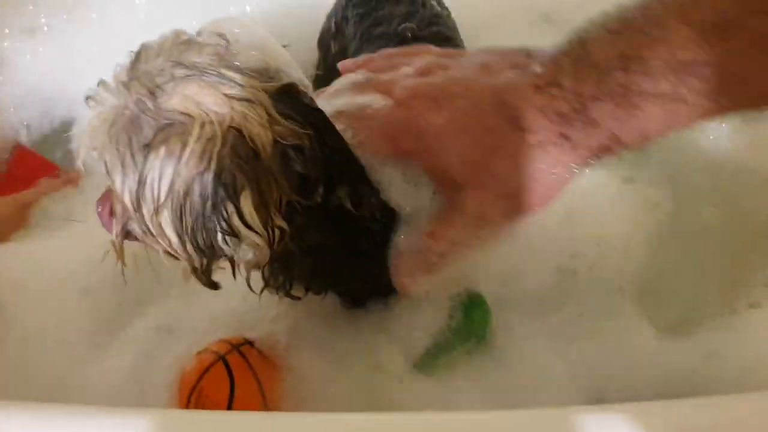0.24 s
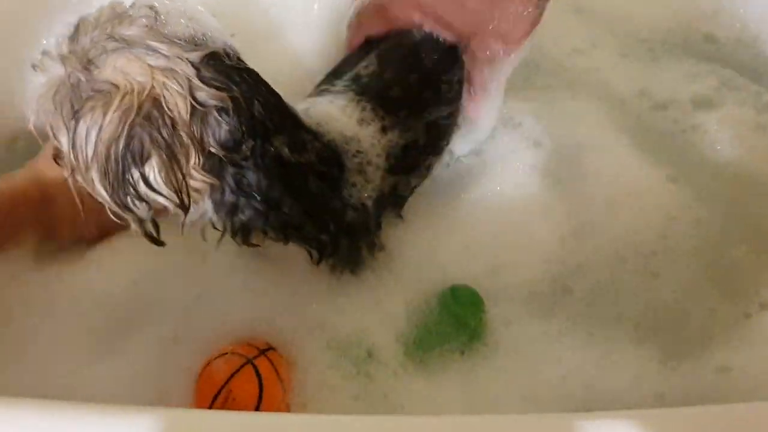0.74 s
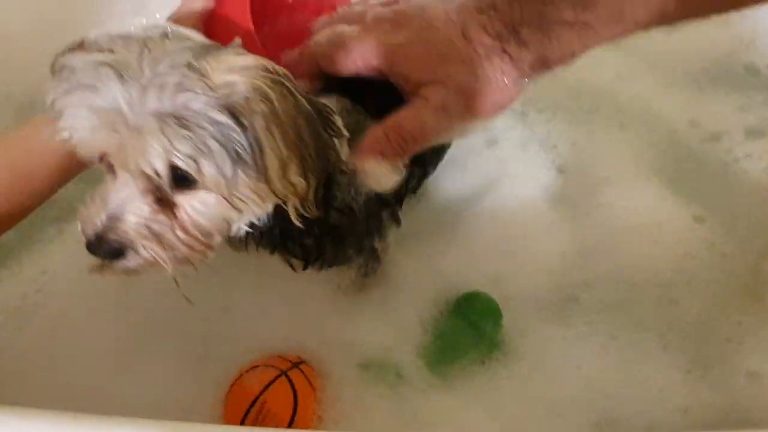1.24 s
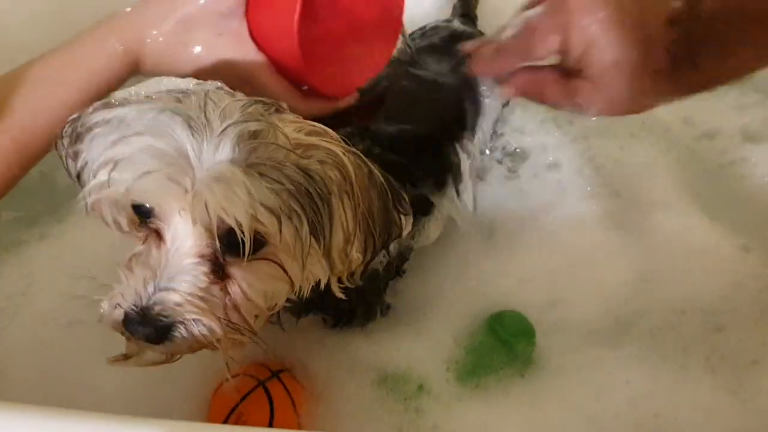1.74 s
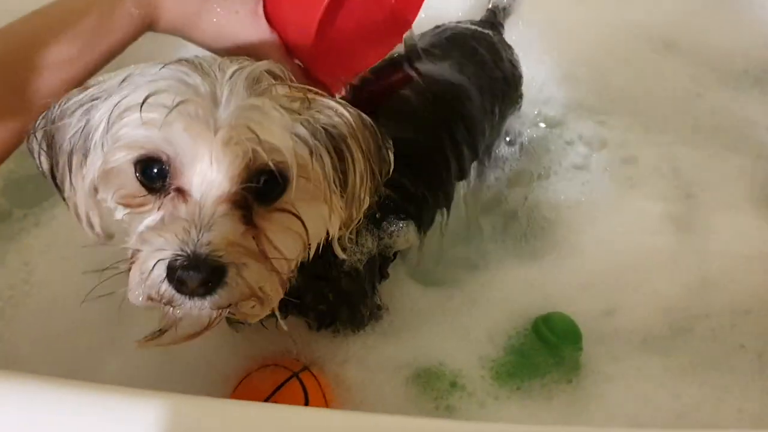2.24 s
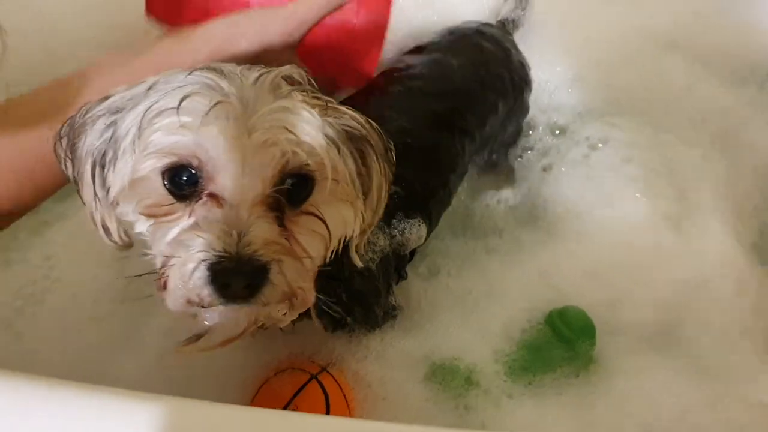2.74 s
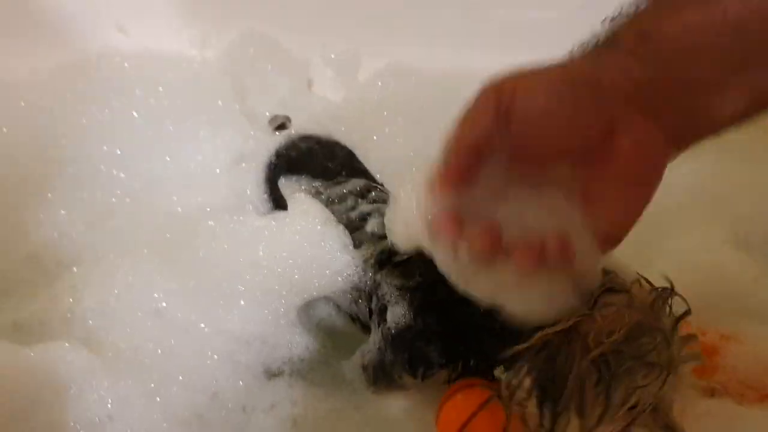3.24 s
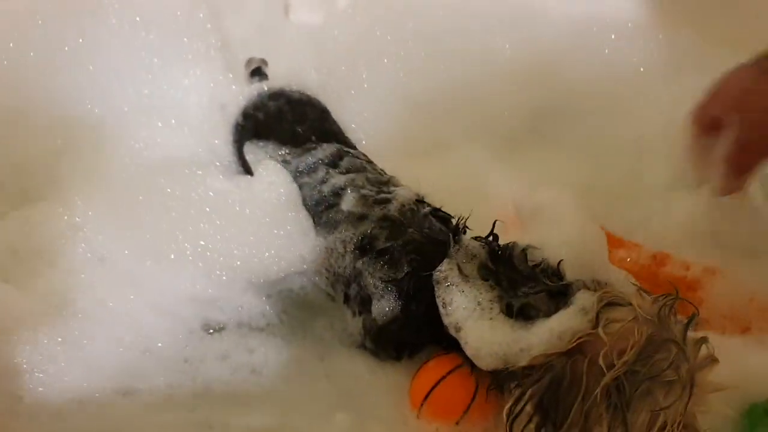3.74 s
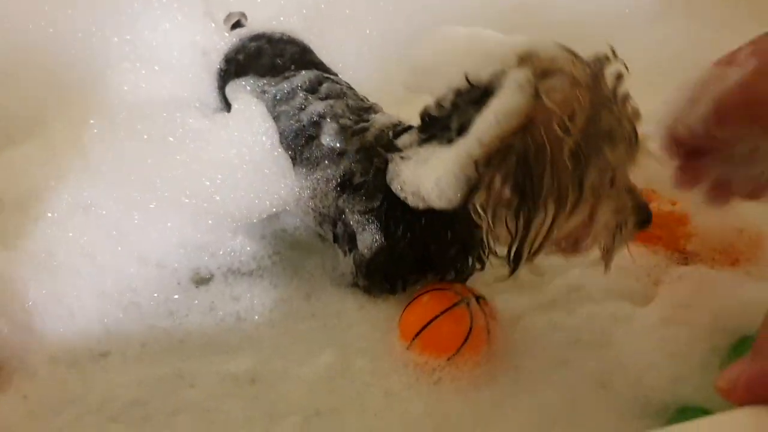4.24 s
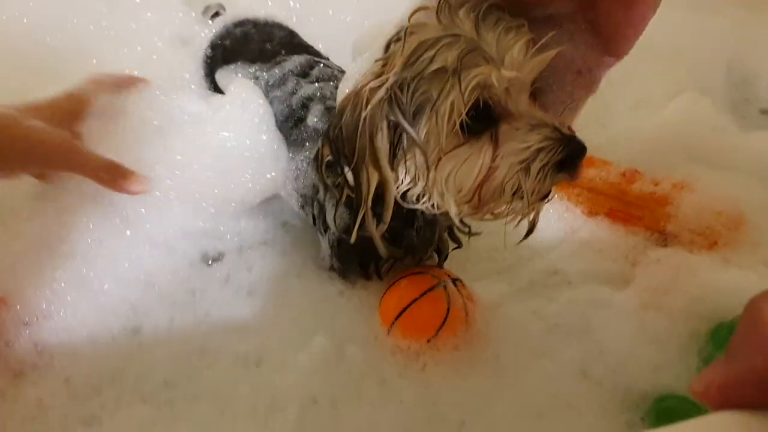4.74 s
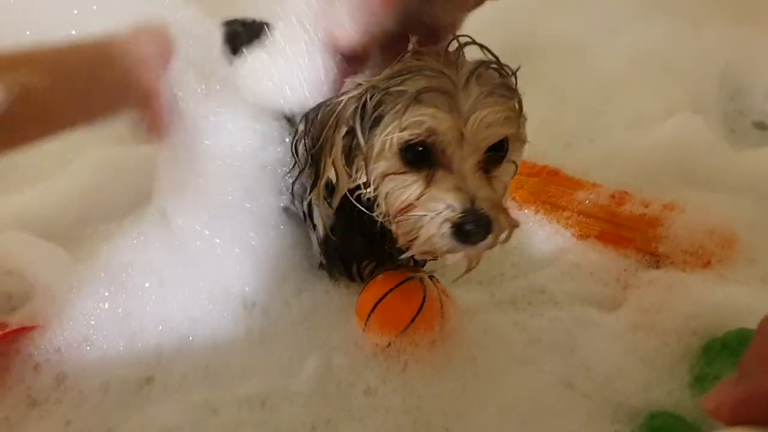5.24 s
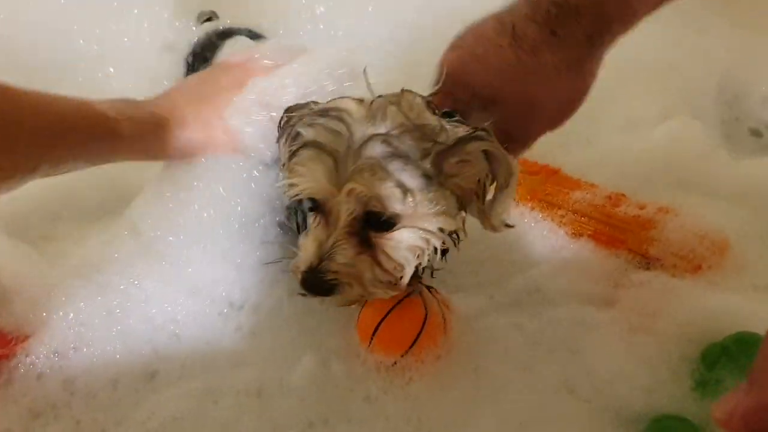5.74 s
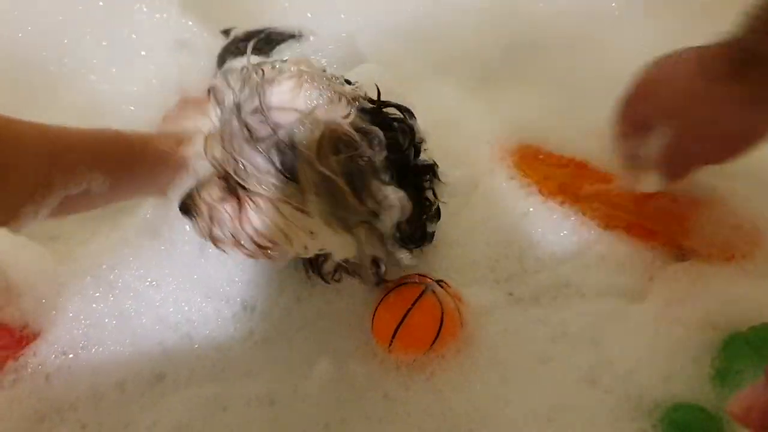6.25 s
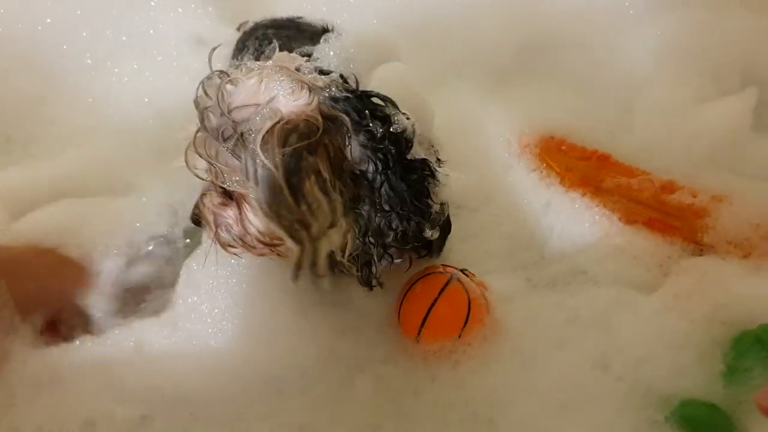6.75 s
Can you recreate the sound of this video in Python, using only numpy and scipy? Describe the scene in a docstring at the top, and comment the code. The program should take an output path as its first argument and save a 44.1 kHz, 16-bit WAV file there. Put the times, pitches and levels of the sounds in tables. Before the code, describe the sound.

Hollow thumps and bubbly plinks in a foamy bath, a brief splashing pour, then an abrupt cut to soft knocks, fizzing suds and faint humming.

```python
"""First a bubble plinks and suds swish under a hand, then slaps and booming knocks: a small dog is washed in a tub.
Hands, paws and a plastic cup strike the tub as shaped pressure pulses that ring its modes and the hard-walled room.
Poured water is a shower of tiny decaying sines; gurgles, plinks and long tub notes are sines that climb in pitch.
Near the middle it cuts to a later moment, with fizzing foam and a low hum of two wavering tones over a rumble.
Faint filtered noise is the air of the bathroom throughout."""
import sys
import numpy as np
from scipy import signal
from scipy.fft import rfft, irfft
from scipy.io import wavfile

SR = 44100
rng = np.random.default_rng(int(sys.argv[2]) if len(sys.argv) > 2 else 0)


def unload_audio(sound):
    """Save the sound as a 16-bit wav file, at the path given as the first command line argument."""
    columns = np.transpose(np.atleast_2d(sound))
    # keep every value between -1 and 1, then stretch to whole-number steps
    steps = np.round(np.clip(columns, -1, 1) * 32767)
    wavfile.write(sys.argv[1], SR, steps.astype(np.int16))


N = 307818
TIME = np.arange(N) / SR
TAIL = np.arange(SR * 3 // 5) / SR  # time axis of one event, 0.6 s
JUMP_S = 2.879  # the cut to the later moment
EDGE_HZ = 15900  # upper band limit

# paws and the cup knock the tub: [t/s, level/dB, corner f/Hz, treble fall/dB per octave, scuffing time/s,
#  tub note favoured by the spot f/Hz, floor boom level/dB, swell of the boom/s]
TUB_KNOCKS = [(0.262, -26.5, 169, 14, 0.025, 270, -40, 0.015),
              (0.338, -19, 190, 13, 0.02, 225, -15.5, 0.035),
              (0.406, -36, 620, 17.5, 0.0012, 778, -27.5, 0.042),
              (1.102, -59, 201, 14, 0.012, 225, -57.5, 0.053),
              (2.249, -25.5, 593, 21.5, 0.0012, 450, -33.5, 0.024),
              (2.276, -37, 595, 24, 0.0022, 778, -53, 0.02),
              (2.294, -30.5, 357, 18, 0.004, 312, -50, 0.018),
              (2.414, -16.5, 423, 10.5, 0.0036, 400, -19.5, 0.034),
              (2.610, -18.5, 850, 15, 0.0061, 778, -22, 0.032),
              (2.645, -22, 340, 12.5, 0.008, 312, -46, .03),
              (3.365, -32.5, 168, 12, 0.0098, 433, -29, 0.048),
              (3.428, -35, 84.8, 11, 0.029, 533, -38, 0.044),
              (3.587, -27.5, 192, 13, 0.011, 394, -38.5, 0.014),
              (3.683, -30.5, 193, 17, 0.0057, 225, -23, 0.034),
              (4.611, -40.5, 286, 16.5, 0.012, 449, -32.5, 0.076),
              (6.218, -41, 60.6, 16.5, 0.016, 77, -75, 0.028)]
# ringing of the tub and the air in it: [f/Hz, relative level/dB, t60/s]
TUB_MODES = [(77, 25, 0.55), (189, 19.5, 0.28), (225, 19.5, 0.35), (271.2, 17, 0.99), (312, 11, 0.44),
             (400, 7, 0.21), (488.6, 13.5, 0.38), (533, 3.5, 0.34), (647, 0.5, 0.2), (778, 10, 0.24),
             (824, 3.5, 0.3), (1168, 1, 0.42), (1304, 7, 0.23)]
FAVOUR_DB, FAVOUR_OCTAVES = 5, 0.12  # every spot on the tub rings the modes in other proportions
MODE_DETUNE = 0.025  # largest random shift of a mode's pitch, as a fraction
BOOM_HZ = 184.2  # drum note of the tub floor

# hands and paws slap or push the water: [t/s, level/dB, corner f/Hz, length of the push/s, droplet shower level/dB]
WATER_SPLASHES = [(0.146, -45.5, 410, 0.026, -52), (0.210, -25.5, 300, 0.000093, -37),
                  (0.534, -48, 640, 0.02, -62.5), (0.64, -53.5, 1070, 0.051, -55.5),
                  (0.829, -43, 354, 0.011, -58), (1.001, -55, 368, 0.0079, -69),
                  (1.099, -53.5, 1240, 0.0011, -55), (1.637, -57.5, 390, 0.0082, -100.5),
                  (1.996, -33, 274, 0.0051, -65), (2.413, -32.5, 2600, 0.01, -58),
                  (2.856, -36, 546, 0.014, -62), (6.148, -44.5, 740, 0.0031, -77),
                  (6.194, -44.5, 460, 0.018, -57), (6.363, -48, 740, 0.065, -68.5),
                  (6.487, -43.5, 400, 0.023, -63), (6.608, -62, 675, 0.049, -97),
                  (6.727, -65.5, 780, 0.07, -97), (6.926, -62, 493, 0.04, -84)]
# treble fall in dB per octave: the longer the push, the duller
SLAP_FALL, SLOSH_FALL, SLOSH_S = 6.86, 23.3, 0.056
# droplets build up, peak just after the slap and thin out
SHOWER_LAG_S, SHOWER_RISE_DB_PER_S, SHOWER_FALL_DB_PER_S = 0.0033, 335.5, 115
# air pulled under by a blow comes up as bubbles; the level is relative to the blow
GURGLE_DB, GURGLE_HZ, GURGLE_OCTAVES, GURGLE_S, GURGLE_FALL_DB_PER_S = 0.5, 620, 0.8, 0.2, 130

# single bubbles and drops, and long ringing notes of the tub near 400 and 469 Hz:
# [t/s, level/dB, starting pitch f/Hz, ring t60/s]
BUBBLES_AND_RINGS = [(0.002, -24.5, 291.5, 0.061), (0.084, -32, 4360, 0.0032), (0.170, -26, 386, 0.32),
                     (0.211, -18, 1187, 0.053), (0.211, -15, 4740, 0.0048), (0.264, -20, 272, 0.093),
                     (0.326, -34.5, 5200, 0.012), (0.405, -15.5, 673, 0.034), (0.641, -26.5, 984, 0.014),
                     (0.676, -35, 920, 0.026), (0.837, -49, 970, 0.018), (0.871, -35, 400, 0.026),
                     (1.004, -49, 1130, 0.043), (1.091, -34.5, 6200, 0.0068), (1.102, -23, 3750, 0.0035),
                     (1.135, -17.5, 2100, 0.0026), (1.774, -20, 900, 0.006), (1.807, -29.5, 2100, 0.0049),
                     (1.827, -31, 1910, 0.023), (1.847, -17, 4600, 0.0011), (1.916, -14, 1250, 0.0052),
                     (1.962, -26, 2910, 0.0063), (2.004, -9, 1104, 0.006), (2.057, -19, 4430, 0.0064),
                     (2.079, -25, 386, 0.16), (2.109, -18.5, 1638, 0.0067), (2.110, -25.5, 598, 0.03),
                     (2.127, -17, 1953, 0.012), (2.155, -23, 1870, 0.0099), (2.165, -18, 1920, 0.011),
                     (2.217, -9.5, 4224, 0.0033), (2.248, -14.5, 950, 0.0048), (2.272, -21.5, 722.5, .12),
                     (2.329, -28, 6830, 0.0031), (2.414, -8.5, 402, 0.34), (2.487, -19, 397, 0.13),
                     (2.578, -25, 8220, 0.0037), (2.613, -12, 1082, 0.029), (2.684, -35, 1050, 0.037),
                     (2.728, -19.5, 245, 0.083), (3.602, -32.5, 400, 0.2), (4.14, -27.5, 2030, 0.0081),
                     (4.981, -42, 1098, 0.017), (5.025, -50, 303, .12), (6.149, -42, 469, 0.89),
                     (6.212, -27, 2470, 0.0017), (6.232, -26, 1350, 0.0032), (6.495, -30, 282, .06),
                     (6.510, -35, 500, 0.066), (6.535, -37.5, 316, 0.14)]
# splat noise against the tone at 1 kHz: high notes splat more
SPLAT_DB, SPLAT_DB_PER_OCTAVE = -15.0206, 0.8

# the cup is tipped over the dog's back and runs empty: [t/s, flow level/dB]
POUR_FLOW = [(1.62, -92), (1.76, -61.5), (1.79, -49), (1.9, -52), (2.0, -43.5), (2.2, -38), (2.37, -52),
             (2.58, -49), (2.7, -60), (2.87, -65)]
# balance of the falling water: [t/s, left-right level/dB]
POUR_BALANCE = [(0, -1), (1.1, -9.5), (2.3, -7), (2.85, -11)]
TRICKLE_DB = -80.5  # the wet coat keeps dripping
# colour of the drops and their singing bubbles: [f/Hz, relative level/dB]
PATTER_COLOUR = [(150, -29.5), (250, -5.5), (375, -9.5), (784, -9.5), (1070, -10), (1570, -14.5),
                 (1970, -12), (2460, -17.5), (4360, -20.5), (7000, -22.5), (10000, -38.5), (15400, -71)]
# colour of the fine crackling spray: [f/Hz, relative level/dB]
SPRAY_COLOUR = [(1470, -13), (2500, -2.5), (3800, 3.5), (5200, -2), (7300, -5), (8900, 0), (10600, -5),
                (12100, 3.5), (16000, -11.5)]

# hands rub suds into the wet coat: [t/s at the height of the stroke, level/dB, half length/s, treble tilt/dB per octave]
SUDS_RUBS = [(0.026, -57, 0.03, 4.5), (0.109, -52, 0.043, 3.5), (0.474, -64, 0.058, 7),
             (0.806, -57, 0.028, -3), (1.057, -58, 0.032, 0.5), (3.28, -64, 0.06, -3),
             (3.375, -62, 0.03, 2), (4.078, -53.5, 0.049, 5), (5.295, -69.5, 0.086, 1),
             (5.429, -60, 0.042, 1), (5.55, -63, 0.033, -1.5), (5.845, -63, 0.041, 6)]
RUB_HZ = 1910  # a swish thins out below this
# colour of the bursting foam cells: [f/Hz, relative level/dB]
FOAM_COLOUR = [(240, -10.5), (400, -5.5), (1490, -1), (2800, -8.5), (4050, -3.5), (7630, -15), (8900, -12),
               (12500, -16.5), (16000, -34.5)]
FOAM_DB = -66

# steady low tones: [f/Hz, rms level/dB]
HUM_TONES = [(76.2, -54.5), (104.3, -52)]
# colour of the soft rumble beneath them: [f/Hz, relative level/dB]
RUMBLE_COLOUR = [(15, -42), (25, -12), (77, -9.5), (98, 7), (131, -13), (162, -14), (199, -9), (435, -24.5),
                 (800, -25.5), (1040, -68), (1760, -120)]
RUMBLE_DB = -54

# colour of the faint bathroom hiss: [f/Hz, relative level/dB]
AIR_COLOUR = [(15, -36), (25, 0.5), (114, 0.5), (463, -26), (3430, -28.5), (4490, -37.5), (5570, -25),
              (16000, -34.5)]
AIR_DB, AIR_SIDE_DB = -64, -5.5  # level and left-right difference
# the fizz sinks briefly, the hiss by a share of it: [t/s, depth level/dB, half length/s]
BACKGROUND_LULLS = [(2.904, -12, 0.041), (3.535, -26, 0.055)]

# decay of the bathroom tail: [f/Hz, t60/s]
ROOM_DECAY = [(150, 0.64), (400, 0.36), (1000, 0.27), (2800, 0.28), (7000, 0.13), (15000, 0.2)]
# likeness of the left and right noise: [f/Hz, correlation]
STEREO_LIKENESS = [(100, 0.98), (200, 0.77), (350, 0.85), (600, 0.33), (1200, 0.083), (15000, 0.048)]


def knocks():
    """Each knock rings the tub and stirs the water, and the weight behind it makes the floor boom."""
    out = np.zeros((2, N))
    for s, db, corner_hz, fall_db, scuffing, note_hz, boom_db, swell_s in TUB_KNOCKS:
        knock = struck(db, corner_hz, fall_db, scuffing, note_hz,
                       side_db=-8.0, wet_db=4.5, ring_db=1.5, direct_db=-5)
        add(out, s, knock + boom(s, boom_db, swell_s) + gurgle(db, corner_hz, fall_db))
    return out


def struck(db, corner_hz, fall_db, scuffing, note_hz, side_db, wet_db, ring_db, direct_db, soft_s=0.0056, swell=0.096):
    """A blow and its brief scuffing ring the tub and the room; a long scuff swells in with hardly any first click."""
    ring = 0
    for hz, mode_db, t60 in TUB_MODES:
        spot_db = FAVOUR_DB * np.exp(-(np.log2(hz / note_hz) / FAVOUR_OCTAVES) ** 2)
        # each blow rings the modes at slightly different pitches, drawn at random
        hz = hz * (1 + MODE_DETUNE * rng.uniform(-1, 1))
        resonance = 2 * np.log(1000) / (t60 * SR) * dying(t60) * np.cos(2 * np.pi * hz * TAIL)
        ring = ring + gain_of(mode_db + ring_db + spot_db) * resonance
    pressure = np.exp(-TAIL / scuffing) * (1 - np.exp(-TAIL / (swell * scuffing)))
    click = np.exp(-scuffing / soft_s)  # a quick slap is nearly one clean pulse
    scuff = rng.standard_normal(len(TAIL)) * pressure / np.linalg.norm(pressure)
    force = (1 - click) * scuff
    force[0] = click
    pulse = through(force, blow(corner_hz, fall_db, side_db))
    sound = through(pulse, bathroom(wet_db, direct_db) + ring)
    return gain_of(db) * sound / np.std(sound[:, :SR // 16])  # level over the first 1/16 s


def blow(corner_hz, fall_db, side_db, bass_fall_db=7.0, lowest_hz=115, shadow_hz=900, size=4096):
    """One-sided pressure pulse: the softer the contact, the lower the corner and the steeper the treble."""
    hz = abs(np.fft.fftfreq(size, 1 / SR)) + 1
    octaves = np.log2(hz / corner_hz)
    treble_db = -fall_db * np.logaddexp(0, 4 * octaves) / 4
    bass_db = -bass_fall_db * np.logaddexp(0, -4 * octaves) / 4
    rumble_cut = hz ** 2 / (hz ** 2 + lowest_hz ** 2)
    gain = gain_of(treble_db + bass_db) * rumble_cut * sides(side_db * hz / (hz + shadow_hz))
    # minimum phase: the energy comes at once
    return np.fft.ifft(np.exp(np.conj(signal.hilbert(np.log(gain + 1e-6))))).real


def boom(s, db, swell_s, side_db=-1, steep=1.78):
    """The tub floor swells and dies on its drum note; booms that overlap swing in step."""
    u = TAIL / swell_s
    swell = (u * np.exp(1 - u)) ** steep
    tone = np.sqrt(2) * np.sin(2 * np.pi * BOOM_HZ * (s + TAIL))
    return sides(side_db) * gain_of(db) * swell * tone


def splashes():
    """A quick slap on the water is bright, a slow push is a dull slosh; both leave a gurgle."""
    out = np.zeros((2, N))
    for s, db, corner_hz, length, _ in WATER_SPLASHES:
        fall_db = SLOSH_FALL + (SLAP_FALL - SLOSH_FALL) * np.exp(-length / SLOSH_S)
        slap = struck(db, corner_hz, fall_db, length, corner_hz,
                      side_db=-7.0, wet_db=3.5, ring_db=3.0, direct_db=-13.5)
        add(out, s, slap + gurgle(db, corner_hz, fall_db))
    return out


def gurgle(db, corner_hz, fall_db, cycles=26, rise=0.32, spread_db=1.0, wet_db=-9, side_db=-3, count=20):
    """Bubbles of mixed sizes chirp upwards one after another; a dull blow favours the big ones."""
    out = np.zeros((1, len(TAIL)))
    draws = np.c_[rng.random(count), rng.standard_normal((count, 2))]
    for k, (when, size, luck) in enumerate(draws):
        age = GURGLE_S * (k + when) / count
        hz = GURGLE_HZ * 2 ** (GURGLE_OCTAVES * np.clip(size, -2, 2))
        dulling_db = fall_db * max(np.log2(hz / corner_hz), 0)
        level_db = db + GURGLE_DB + spread_db * luck - GURGLE_FALL_DB_PER_S * age - dulling_db
        add(out, age, gain_of(level_db) * plink(hz, cycles / hz, rise, size=5000)[None])
    return sides(side_db) * through(out, bathroom(wet_db))


def bubbles_and_rings(wet_db=-7, splat_wet_db=0, splat_t60=0.024, splat_reach=1.6, side_db=-5, shadow_hz=700):
    """Bubbles, drops and long tub notes: each is a ringing tone with a short noise splat, duller for low notes."""
    out = np.zeros((2, N))
    for s, db, hz, t60 in BUBBLES_AND_RINGS:
        splat_db = SPLAT_DB + SPLAT_DB_PER_OCTAVE * np.log2(hz / 1000)
        splat = gain_of(splat_db) * rng.standard_normal(len(TAIL)) * dying(splat_t60)
        splat = signal.lfilter(*signal.butter(1, min(splat_reach * hz, SR / 3), fs=SR), splat)
        tone = through(plink(hz, t60), bathroom(wet_db, near_db=-5))
        event = tone + through(splat, bathroom(splat_wet_db))
        add(out, s, gain_of(db) * sides(side_db * hz / (hz + shadow_hz)) * event)
    return out


def plink(hz, t60, rise=0.0087, size=len(TAIL)):
    """A tone swells over a few cycles, rings and climbs in pitch, like a bubble nearing the surface."""
    t = TAIL[:size]
    pitch = hz * (1 + rise * np.minimum(t / t60, 1))
    envelope = np.exp(-np.log(1000) * t / t60) * (1 - np.exp(-t * hz))
    return envelope * np.sin(2 * np.pi * np.cumsum(pitch) / SR)


def water(patter_db=-2, notes_db=0, spray_db=-4, spurt_db=1.48):
    """Water patters densely off the coat into the bath; larger bubbles sing in it and spray crackles above it."""
    patter = droplets(low_hz=200, high_hz=6000, per_s=2000, cycles=5, spread_db=4, wet_db=-6, count=32)
    notes = droplets(low_hz=520, high_hz=5200, per_s=300, cycles=16, spread_db=3.5, wet_db=-9, rise=.2)
    spray = droplets(low_hz=1990, high_hz=12500, per_s=1100, cycles=2.2, spread_db=4.0, wet_db=4)
    body = coloured(patter, PATTER_COLOUR) + coloured(notes, PATTER_COLOUR) * gain_of(notes_db)
    mix = body * gain_of(patter_db) + coloured(spray, SPRAY_COLOUR) * gain_of(spray_db)
    falling = flow() * gain_of(spurt_db * drift(56))
    return mix * falling * sides(np.interp(TIME, *np.transpose(POUR_BALANCE)))


def flow():
    """How much water is falling: the pour, a shower from every splash and a steady trickle, added as powers."""
    pouring = (TIME > POUR_FLOW[0][0]) & (TIME < JUMP_S)
    pour = gain_of(np.interp(TIME, *np.transpose(POUR_FLOW)))
    power = gain_of(TRICKLE_DB) ** 2 + pouring * pour ** 2
    for s, *_, shower_db in WATER_SPLASHES:
        age = TIME - s - SHOWER_LAG_S
        fade_db = np.maximum(-SHOWER_RISE_DB_PER_S * age, SHOWER_FALL_DB_PER_S * age)
        same_moment = (TIME < JUMP_S) == (s < JUMP_S)
        power = power + gain_of(shower_db - fade_db) ** 2 * same_moment
    return np.sqrt(power)


def droplets(low_hz, high_hz, per_s, cycles, spread_db, wet_db, rise=0, count=24):
    """A shower of tiny bubbles of many sizes, each size from its own spot."""
    out = np.zeros((2, N))
    for hz in np.geomspace(low_hz, high_hz, count):
        hits = rng.random(N) < per_s / count / SR
        train = gain_of(spread_db * np.minimum(rng.exponential(1, N), 4)) * hits
        grain = np.sqrt(hz) * evened(plink(hz, cycles / hz, rise, size=2200))  # equal power per Hz
        sound = signal.oaconvolve(train, grain)[:N]
        pair = np.array([np.roll(sound, rng.integers(0, 20)), np.roll(sound, 10)])  # arrival differs by ear
        out += sides(rng.normal(0, 3.4)) * pair
    return through(out, bathroom(wet_db))


def suds(below_db=3, side_db=-8, flicker_db=1.0):
    """Countless tiny foam cells burst: a swish under each stroke of the hand, and a faint fizz after the jump."""
    cells = droplets(low_hz=490, high_hz=14100, per_s=7000, cycles=3.06, spread_db=6.0, wet_db=5.0)
    fizz = coloured(cells, FOAM_COLOUR) * gain_of(flicker_db * drift(36))
    out = gain_of(FOAM_DB + lulls()) * fizz * (TIME > JUMP_S)
    spectrum = rfft(fizz)
    octaves = np.log2((np.fft.rfftfreq(N, 1 / SR) + 1) / RUB_HZ)
    for s, db, half, tilt_db in SUDS_RUBS:
        tilt = gain_of(np.where(octaves < 0, below_db, tilt_db) * octaves)
        swish = evened(irfft(spectrum * tilt, N))
        out = out + gain_of(db) * swish * bell(s, half)
    return out * sides(side_db)


def hum(waver=0.067, wander=1.0):
    """Two low tones, wavering in level and phase, over a soft rumble, as from a fan."""
    tones = 0
    for hz, db in HUM_TONES:
        level = gain_of(db) * np.sqrt(2) * (1 + waver * drift(5.3))
        tones = tones + level * np.sin(2 * np.pi * hz * TIME + wander * drift(0.35))
    rumble = gain_of(RUMBLE_DB) * coloured(noise_pair(N), RUMBLE_COLOUR)
    return (tones + rumble) * np.clip((TIME - JUMP_S) / 0.0036, 0, 1)  # only after the jump


def air(lull_share=0.38):
    """The faint hiss of the bathroom: coloured noise."""
    level = gain_of(AIR_DB + lull_share * lulls())
    return level * sides(AIR_SIDE_DB) * coloured(noise_pair(N), AIR_COLOUR)


def lulls():
    """Brief dips of the background, in dB."""
    return sum(db * bell(s, half) for s, db, half in BACKGROUND_LULLS)


def bathroom(wet_db, direct_db=0, near_db=-1, near_s=0.00022):
    """Direct sound, a quick scatter off the tub sides, then a dense tail off the walls; every call draws its own."""
    hz, t, z = signal.stft(noise_pair(len(TAIL)), SR, nperseg=256)
    decay = np.exp(-np.log(1000) * t / read(ROOM_DECAY, hz)[:, None])
    tail = signal.istft(z * decay, SR, nperseg=256)[1][:, :len(TAIL)]
    tail = tail * (1 - np.exp(-TAIL / 0.0011))  # the walls answer a moment later
    near = noise_pair(len(TAIL)) * np.exp(-TAIL / near_s)
    echoes = (gain_of(near_db) * evened(near) + gain_of(wet_db) * evened(tail)) / np.sqrt(len(TAIL))
    direct = gain_of(direct_db) * signal.unit_impulse(len(TAIL))
    return (direct + echoes) / np.hypot(gain_of(direct_db), gain_of(near_db))


def through(x, response):
    """Convolves, keeping the length of x."""
    return signal.fftconvolve(np.atleast_2d(x), np.atleast_2d(response), axes=1)[:, :x.shape[-1]]


def noise_pair(size):
    """Noise for left and right: alike in the bass, nearly unrelated in the treble."""
    a, b = rfft(rng.standard_normal((2, size)))
    same = np.clip(read(STEREO_LIKENESS, np.fft.rfftfreq(size, 1 / SR)), -1, 1)
    return irfft(np.array([a, same * a + np.sqrt(1 - same ** 2) * b]), size)


def coloured(x, spectrum):
    """Filters x by a level table, at rms 1."""
    return evened(irfft(rfft(x) * gain_of(read(spectrum, np.fft.rfftfreq(N, 1 / SR))), N))


def drift(hz):
    """Random wavering slower than about hz, rms 1."""
    lowpass = np.exp(-(np.fft.rfftfreq(N, 1 / SR) / hz) ** 2)
    return evened(irfft(rfft(rng.standard_normal(N)) * lowpass, N))


def bell(s, half):
    """A smooth swell from 0 to 1 and back, highest at s."""
    return np.exp(-((TIME - s) / half) ** 2)


def dying(t60):
    """Envelope that falls 60 dB in t60 seconds."""
    return np.exp(-np.log(1000) * TAIL / t60)


def sides(db):
    """Left and right gains for a level difference."""
    return gain_of(np.array([[.5], [-.5]]) * db)


def gain_of(db):
    """Decibels to amplitude."""
    return 10 ** (np.asarray(db) / 20)


def evened(x):
    """Scales to rms 1."""
    return x / np.sqrt(np.mean(x ** 2) + 1e-20)


def read(points, hz):
    """Reads a table on a log-frequency axis."""
    f, value = np.transpose(points)
    return np.interp(np.log(hz + 1), np.log(f + 1), value)


def add(mix, s, sound):
    """Mixes a sound in at s; what began before the jump stops there."""
    end = round(JUMP_S * SR) if s < JUMP_S else N
    part = mix[:, max(round(s * SR), 0):end][:, :sound.shape[1]]
    part += sound[:, :part.shape[1]]


def scene():
    """All sources over the still air of the bathroom."""
    return knocks() + splashes() + bubbles_and_rings() + water() + suds() + hum() + air()


def record(dry):
    """Limits the band with a steep low-pass."""
    lowpass = signal.firwin(511, EDGE_HZ, window=("kaiser", 9), fs=SR)
    return signal.oaconvolve(dry, lowpass[None], "same")


dry = scene()
out = record(dry)
unload_audio(out)
```